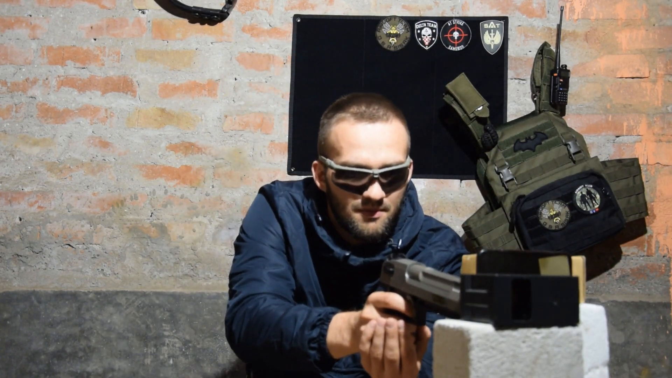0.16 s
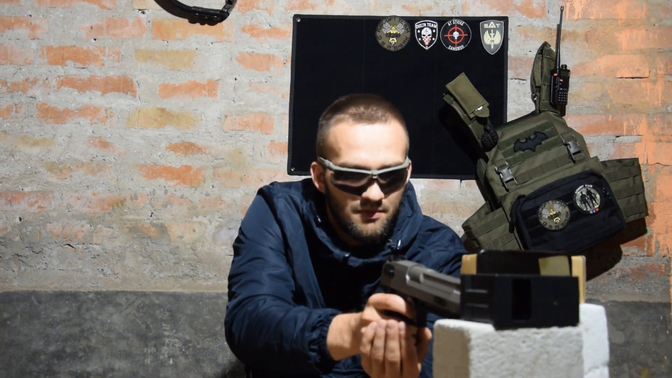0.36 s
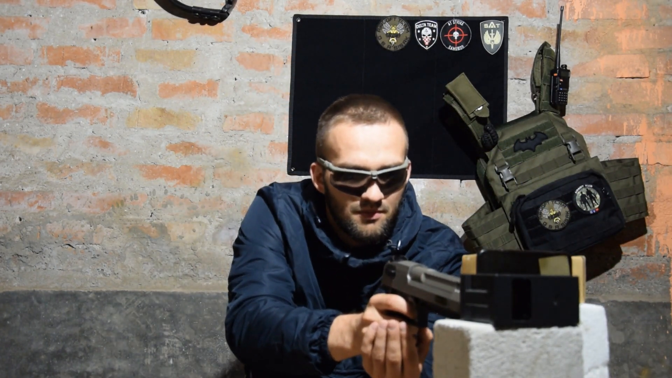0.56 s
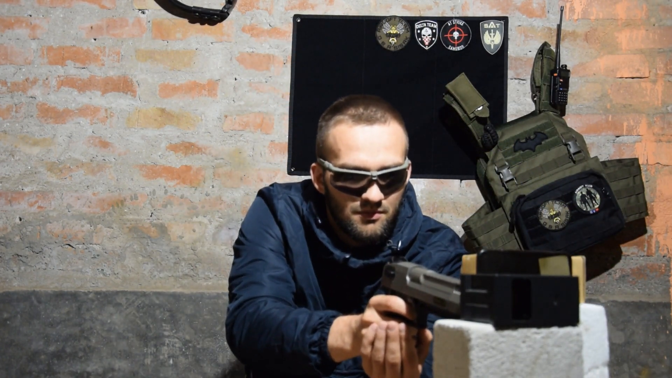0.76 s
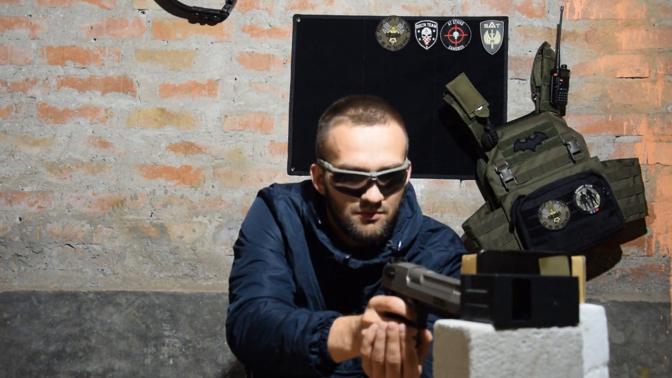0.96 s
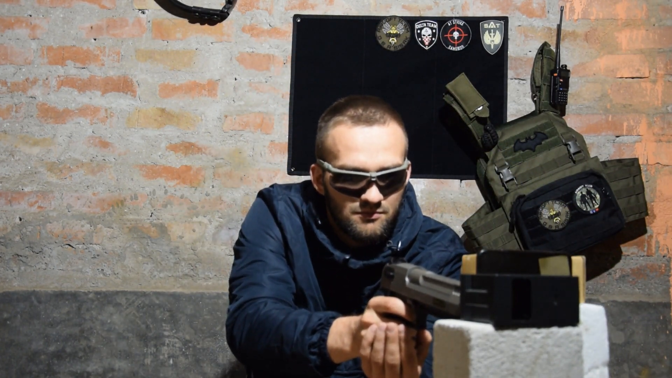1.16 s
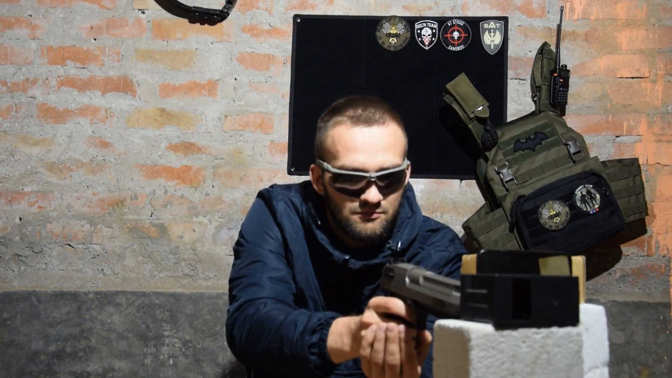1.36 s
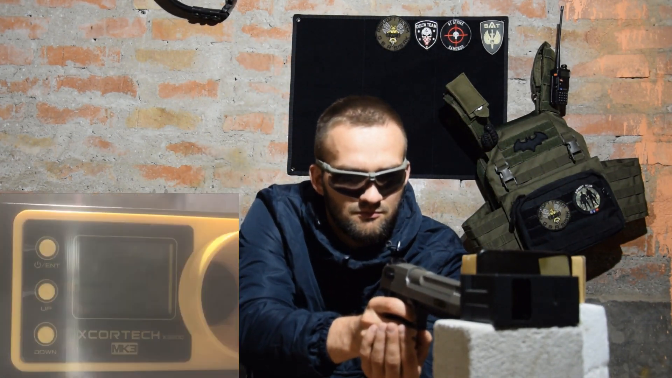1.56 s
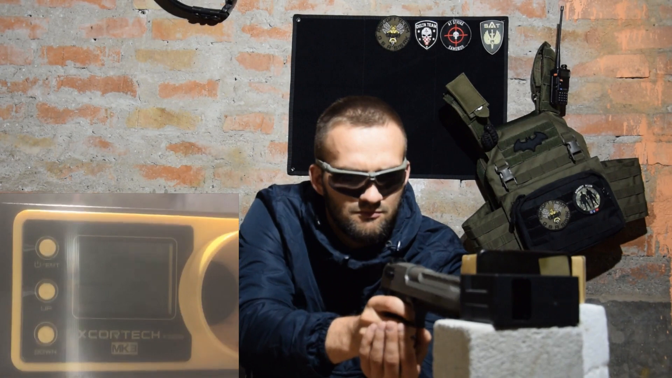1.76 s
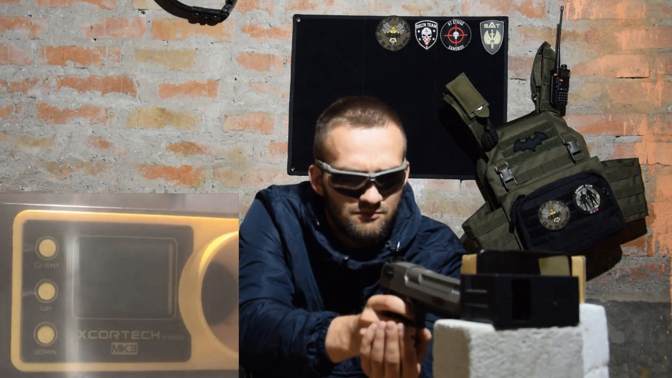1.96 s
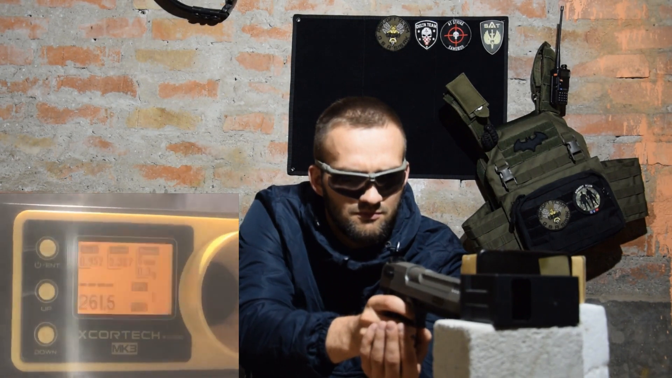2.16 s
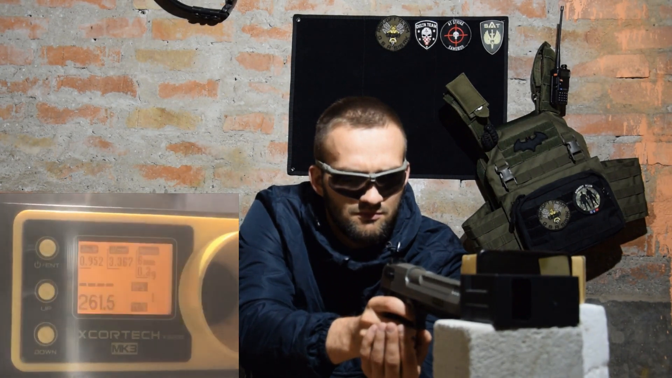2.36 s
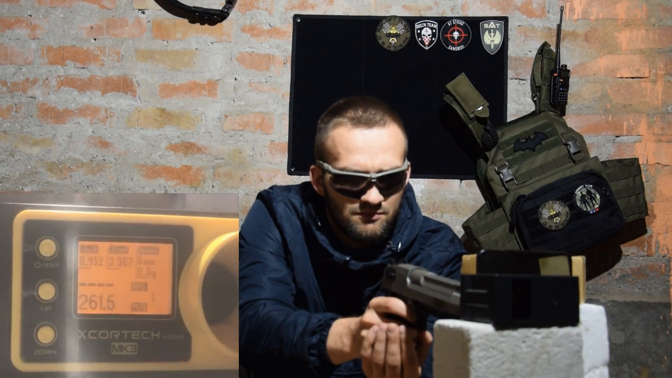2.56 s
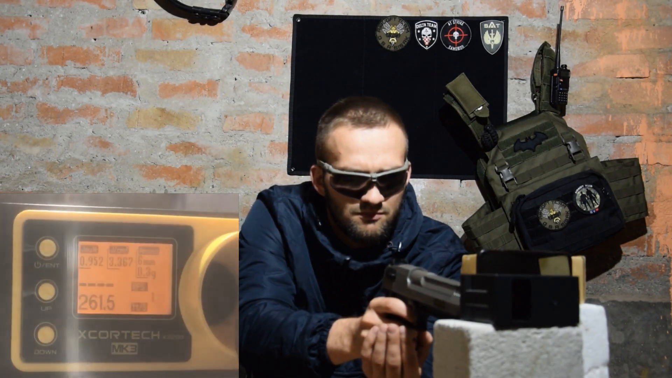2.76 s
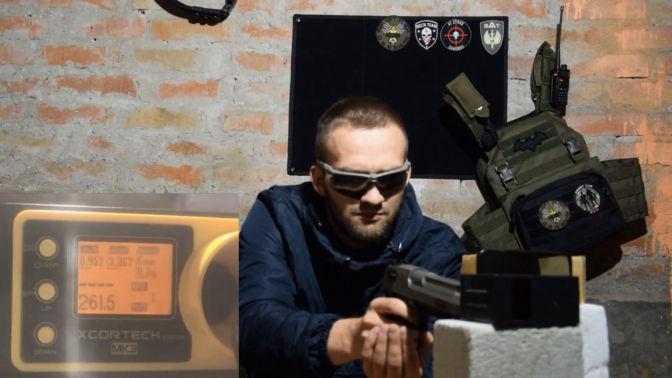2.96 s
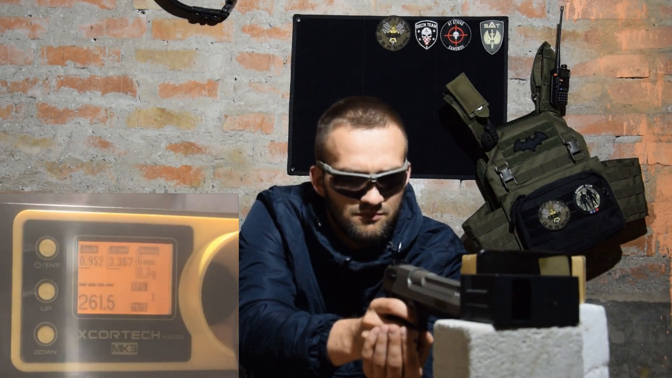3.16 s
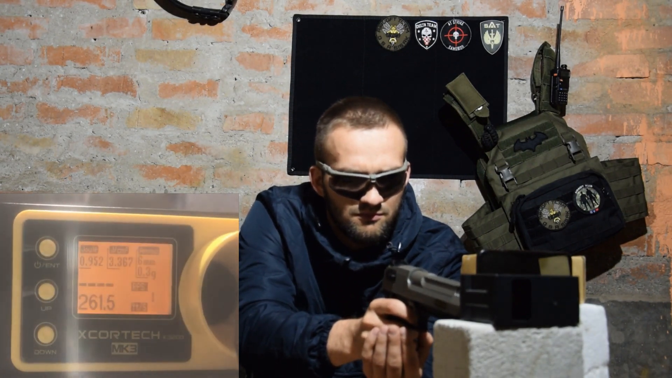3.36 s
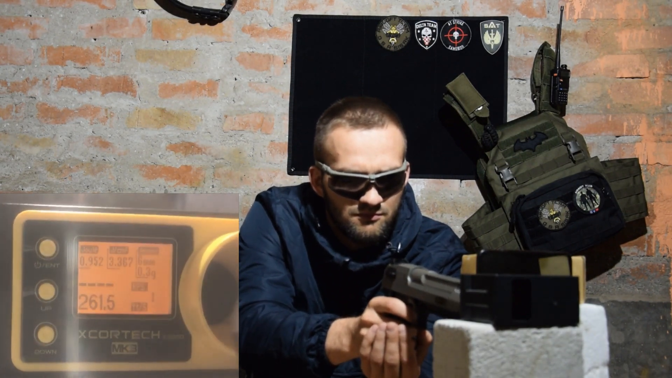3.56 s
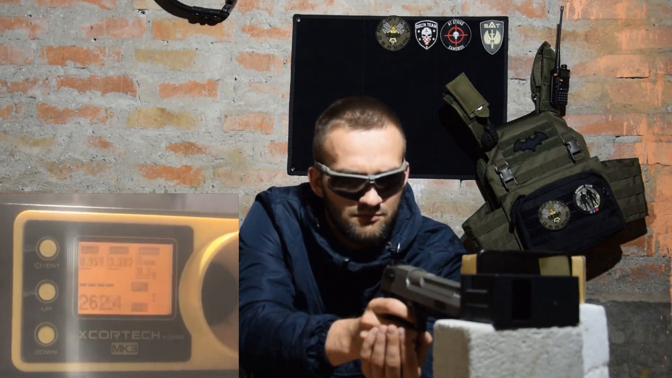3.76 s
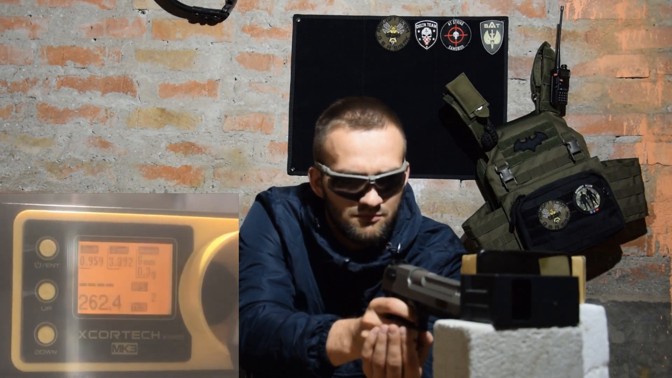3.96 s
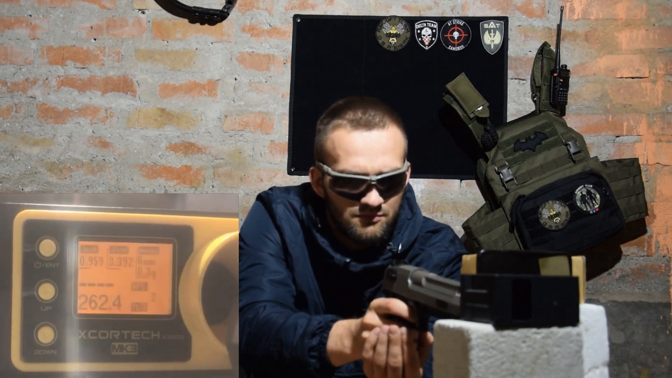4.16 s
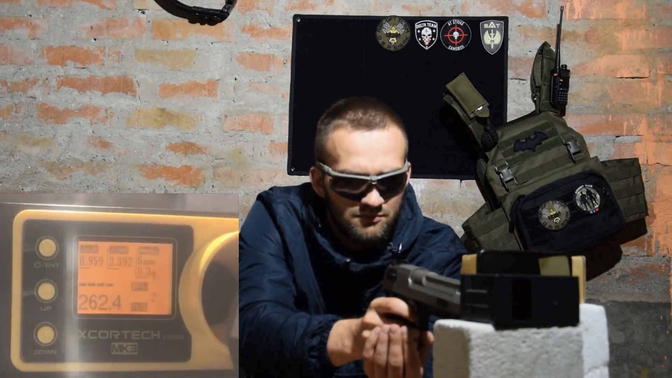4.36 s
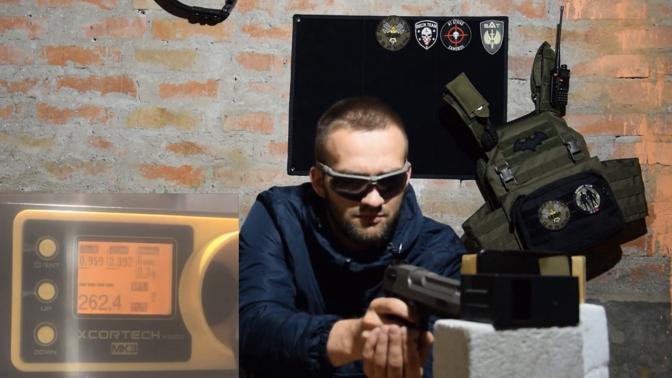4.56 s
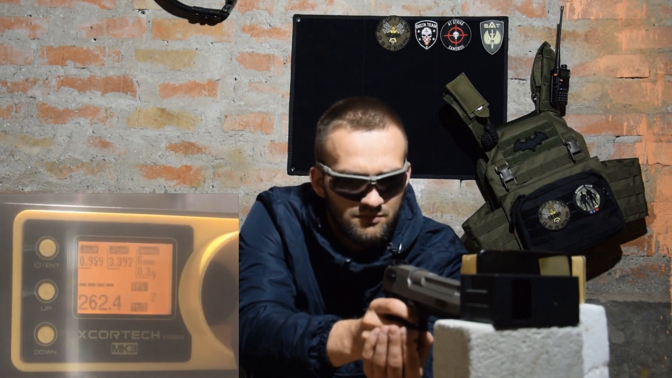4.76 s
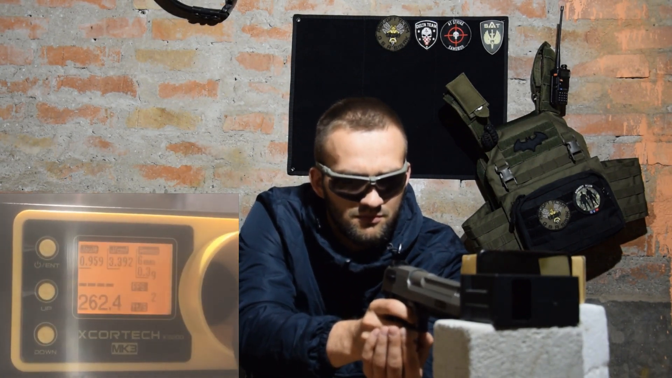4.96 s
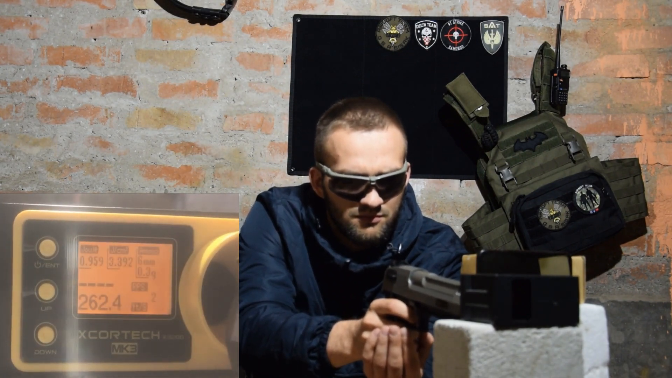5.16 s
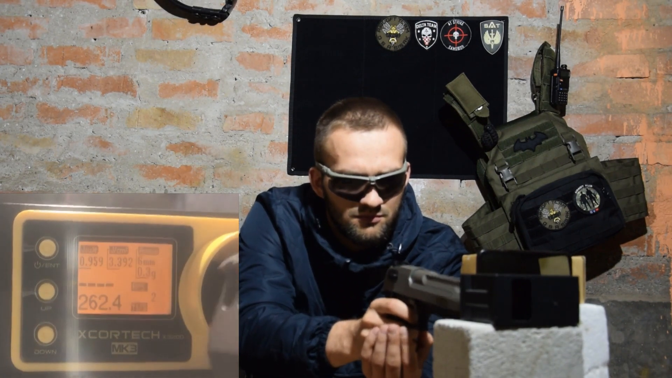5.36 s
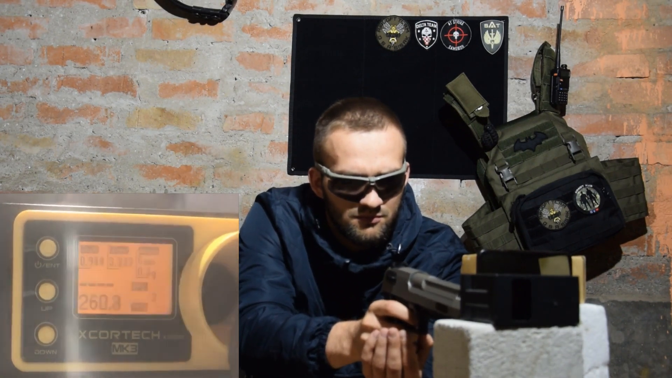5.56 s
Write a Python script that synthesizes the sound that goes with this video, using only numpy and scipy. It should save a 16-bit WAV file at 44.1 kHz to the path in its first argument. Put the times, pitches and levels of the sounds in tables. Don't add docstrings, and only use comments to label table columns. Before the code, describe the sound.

Three sharp, distorted gas pistol shots in a small brick cellar, each with a quick metallic slide slam, pellets ticking and knocking afterward over steady hiss.

```python
import sys
import numpy as np
from scipy import signal
from scipy.fft import rfft, irfft
from scipy.io import wavfile
from scipy.ndimage import uniform_filter1d

SR = 44100
rng = np.random.default_rng(int(sys.argv[2]) if len(sys.argv) > 2 else 0)


def boost(x):
    u = np.asarray(x, float) / 20
    return 10 ** u


def to_wav(s):
    ch = np.atleast_2d(s).T
    pcm = np.round(np.clip(ch, -1, 1) * 32767)
    wavfile.write(sys.argv[1], SR, pcm.astype(np.int16))


N = 248062
TAIL = 21000


def evened(x):
    return x / np.sqrt(np.mean(x ** 2) + 1e-20)


def read(points, hz):
    f, value = np.transpose(points)
    return np.interp(np.log(hz + 1), np.log(f + 1), value)


def add(mix, start_s, sound):
    part = mix[round(start_s * SR):][:len(sound)]
    part += sound[:len(part)]


def smooth_noise(shape, size):
    return uniform_filter1d(uniform_filter1d(rng.standard_normal(shape), size=size), size=size)


def band(x, lo_hz, hi_hz):
    x = signal.sosfilt(signal.butter(1, lo_hz, "high", fs=SR, output="sos"), x)
    return signal.sosfilt(signal.butter(3, min(hi_hz, .45 * SR), fs=SR, output="sos"), x)


# pitch_hz, level_db
HISS = [(25, -14), (60, 2.5), (400, -1.5), (1000, -9), (2000, -11.5), (3300, -16), (7500, -21.5),
        (11000, -31.5), (15600, -38.5)]
# pitch_hz, half_width_hz, level_db
DRIVE_WHINE = [(1120, 91, -72.5), (1490, 58, -75.5), (2660, 40, -81.5), (2899, 210, -77), (3677, 81, -70),
               (3926, 110, -64), (4340, 84, -72.5), (4570, 120, -74.5), (5334, 190, -69),
               (6100, 120, -80.5), (6460, 223, -82), (7010, 200, -78.5)]


def camera_noise():
    hz, t = np.fft.rfftfreq(N, 1 / SR), np.arange(N) / SR
    hiss_noise, drive_noise = rfft(rng.standard_normal((2, N)))
    hiss = boost(-61.5) * evened(irfft(hiss_noise * boost(read(HISS, hz)), N))
    humps = np.zeros(len(hz))
    for pitch_hz, width_hz, db in DRIVE_WHINE:
        hump = np.exp(-((hz - pitch_hz) / width_hz) ** 2 / 2)
        humps += boost(db) * hump * np.sqrt(SR / 2 / width_hz / np.sqrt(np.pi))
    throb = boost(1.5 * evened(smooth_noise(N, 300)))
    whine = throb * irfft(drive_noise * humps, N)
    thin_tone = boost(-84) * np.sqrt(2) * np.sin(2 * np.pi * 15682 * t)
    return hiss + whine + thin_tone


# pitch_hz, t60_s
ROOM = [(70, 0.13), (140, 0.39), (300, 0.36), (700, .24), (1700, 0.26), (4500, .22), (8000, 0.18),
        (13000, 0.18)]


def cellar(direct_db, puff_s, build_s=0.0018, patchy_db=1.5, colour_db=2.5, wall_db=-10):
    t, hz = np.arange(TAIL) / SR, np.fft.rfftfreq(TAIL, 1 / SR)
    burst, echoes, patches = rng.standard_normal((3, TAIL))
    burst = (burst * np.exp(-t / puff_s))[:2000]
    burst = burst * np.sqrt(puff_s * SR / 2) / np.linalg.norm(burst)
    walls = np.zeros(1400)
    walls[rng.integers(100, 1400, size=7)] = boost(wall_db)
    walls = walls * boost(-60 * t[:len(walls)] / 0.16)
    walls[0] = 1
    direct = signal.fftconvolve(burst, walls)

    echoes = echoes * boost(patchy_db * evened(uniform_filter1d(patches, size=60)))
    clusters = evened(smooth_noise(len(hz), 50))
    spectrum = rfft(echoes) * boost(colour_db * clusters)
    place = read([(f, k) for k, (f, _) in enumerate(ROOM)], hz)
    tail = np.zeros(TAIL)
    for k, (_, t60_s) in enumerate(ROOM):
        share = np.maximum(1 - abs(place - k), 0)
        tail += irfft(spectrum * share) * boost(-60 * t / t60_s)
    heard = tail * (1 - np.exp(-t / build_s))
    add(heard, 0, boost(direct_db) * direct)
    return heard


def rings(modes):
    t = np.arange(TAIL) / SR
    a, b = smooth_noise((2, len(modes), TAIL), 900)
    waver = 1 + .3 * (evened(a) + 1j * evened(b))
    hz, db, t60_s = np.transpose(modes)[:, :, None]
    tones = boost(db - 60 * t / t60_s) * (waver * np.exp(2j * np.pi * hz * t)).imag
    return (1 - np.exp(-t / 0.0084)) * tones.sum(axis=0)


# pitch_hz, level_db, t60_s
BOX = [(140, 0, .6), (405, -4, .2), (520, -8, .15), (915, 0, .2), (1570, -5, .1), (2320, -6, .14),
       (2907, -8, .14)]


def knock(db, lo_hz, hi_hz, direct_db, ring_db=-60, modes=BOX, puff_s=0.00062):
    heard = band(cellar(direct_db, puff_s), lo_hz, hi_hz)
    heard /= np.sqrt(np.mean(heard[200:900] ** 2))
    return boost(db) * (heard + boost(ring_db) * band(rings(modes), lo_hz, hi_hz))


# start_s, level_db, box_ring_db
THUDS = [
    (.25, -53.5, -22),
    (2.460, -40.5, 7.5),
    (2.7836, -46.5, 1),
    (3.789, -45.5, 9.5),
    (4.982, -50, -8),
    (5.4925, -34, 13.5),
    (5.590, -31, 8.5),
]


def box_thuds():
    out = np.zeros(N)
    for start_s, db, ring_db in THUDS:
        add(out, start_s, knock(db, lo_hz=121, hi_hz=640, direct_db=-13, ring_db=ring_db))
    return out


# start_s, level_db, contact_hardness_hz, box_ring_db
RAPS = [
    (2.139, -18.5, 2700, -22),
    (2.169, -26.5, 4240, 14),
    (2.459, -37.5, 2430, -8.5),
    (2.557, -40.5, 1500, -10),
    (3.785, -43, 2290, 4),
    (4.98, -53.5, 1580, -8),
    (5.492, -15.5, 3100, 7.5),
]


def box_raps():
    out = np.zeros(N)
    for start_s, db, hard_hz, ring_db in RAPS:
        direct_db = -7 + 21 * np.log2(hard_hz / 2000)
        modes = BOX[1:]
        add(out, start_s, knock(db, hard_hz / 2.43, hard_hz, direct_db, ring_db, modes))
    return out


# start_s, level_db, low_edge_hz, contact_hardness_hz, direct_db
TICKS = [
    (2.0674, -19, 7000, 10860, 7.5),
    (2.1379, -22.5, 3000, 10900, 22),
    (2.1687, -16.5, 6100, 11000, 15),
    (2.556, -52, 1800, 6800, -4),
    (2.7816, -24.5, 2770, 9000, 7.5),
    (3.2662, -31.5, 1703, 7810, 8),
    (5.495, -12.5, 3960, 9300, 12),
    (5.589, -13.5, 2000, 5670, 6),
]


def pellet_ticks():
    out = np.zeros(N)
    for start_s, db, lo_hz, hard_hz, direct_db in TICKS:
        add(out, start_s, knock(db, lo_hz, hard_hz, direct_db, ring_db=-35))
    return out


# start_s, level_db, low_edge_hz, direct_db
TRIGGER = [
    (1.692, -61, 2500, 17),
    (3.2018, -59, 8930, 31),
    (3.209, -51.5, 9000, 16),
    (3.461, -62.5, 8930, 11.5),
    (3.469, -62, 8000, 12.5),
    (3.92, -59, 6000, 2.5),
    (5.299, -53, 1200, 5),
]


def trigger_creep():
    out = np.zeros(N)
    for start_s, db, lo_hz, direct_db in TRIGGER:
        add(out, start_s, band(knock(db, lo_hz, 10500, direct_db), lo_hz, 16000))
    return out


# pitch_hz, level_db, t60_s
BARREL = [(147, -1, .25), (240, -3, .12), (345, 2, .1), (420, 4, .12), (510, -1, .1), (688, 0, .1),
          (1130, -5, .1)]
# pitch_hz, level_db, t60_s
SLIDE = [(1340, 0, .19), (1373, -3, .17), (1650, -7, .12), (2640, -9, .12)]
# blast_s, hammer_db, barrel_thump_db, slide_return_delay_s, slide_ring_db
SHOTS = [
    (1.7293, -29, -3, .060, 0.5),
    (3.5256, -23.5, -1, .061, -3.5),
    (5.3174, -27.5, -3.5, .066, -0.5),
]


def pistol_shots():
    out = np.zeros(N)
    for blast_s, hammer_db, thump_db, slide_delay_s, ring_db in SHOTS:
        sear = knock(hammer_db - 22.5, lo_hz=3000, hi_hz=6000, direct_db=5)
        add(out, blast_s - .0125, sear)
        hammer = knock(hammer_db, lo_hz=2000, hi_hz=8000, direct_db=5)
        add(out, blast_s - .0065, hammer)
        t = np.arange(-.009, 0, 1 / SR)
        gas = evened(band(rng.standard_normal(len(t)), lo_hz=500, hi_hz=5000))
        add(out, blast_s + t[0], boost(-13 + 6700 * t) * gas)
        blast = knock(5.5, lo_hz=150, hi_hz=11500, direct_db=-2.5, ring_db=thump_db,
                      modes=BARREL, puff_s=0.0029)
        add(out, blast_s, blast)
        slide = knock(0.97, lo_hz=1800, hi_hz=10146, direct_db=1.0, ring_db=ring_db,
                      modes=SLIDE, puff_s=.002)
        add(out, blast_s + slide_delay_s, slide)
    return out


def scene():
    return (box_thuds() + box_raps() + pellet_ticks() + trigger_creep() + pistol_shots())[None]


def roll_off(x):
    return signal.sosfilt(signal.butter(12, 16970, fs=SR, output="sos"), x)


# pitch_hz, gain_db
MIC = [(40, -17.5), (150, -10.5), (1000, -4), (3000, -2.5), (5000, -1.5), (6800, 3), (8200, -3.5),
       (10000, -14), (15500, -20.5)]


def record(dry):
    log_gain = np.log(boost(read(MIC, abs(np.fft.fftfreq(4096, 1 / SR)))))
    capsule = np.fft.ifft(np.exp(np.conj(signal.hilbert(log_gain)))).real[:2048]
    ceiling, knee = 0.53, 5.
    x = signal.oaconvolve(dry, capsule[None])[:, :N] / ceiling
    x = ceiling * x / (1 + abs(x) ** knee) ** (1 / knee)
    x = x + camera_noise()
    band_limit = signal.firwin(511, 15850, window=("kaiser", 6), fs=SR)
    x = signal.oaconvolve(x, band_limit[None], "same")
    return roll_off(x)


dry = scene()
out = record(dry)
to_wav(out)
```